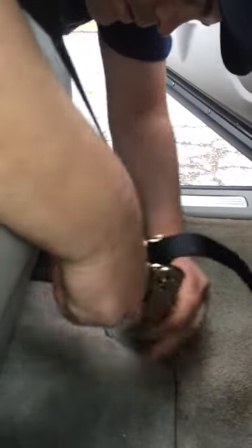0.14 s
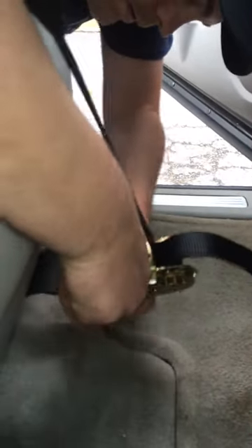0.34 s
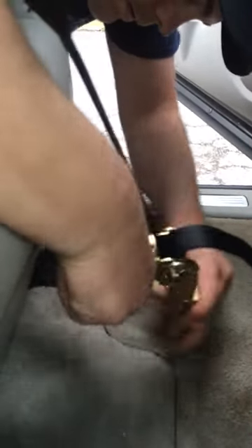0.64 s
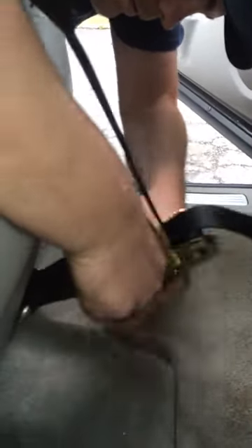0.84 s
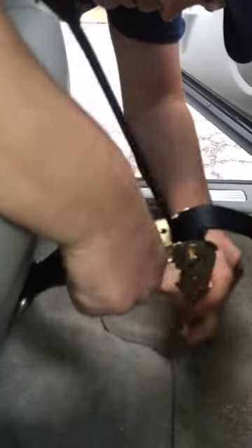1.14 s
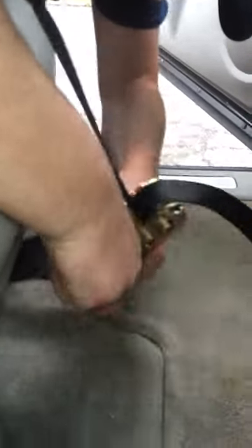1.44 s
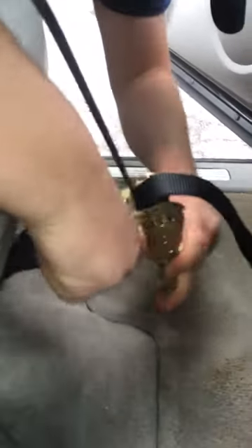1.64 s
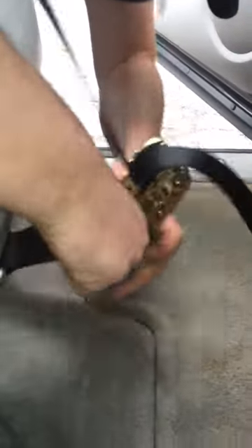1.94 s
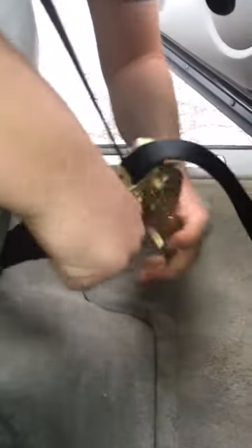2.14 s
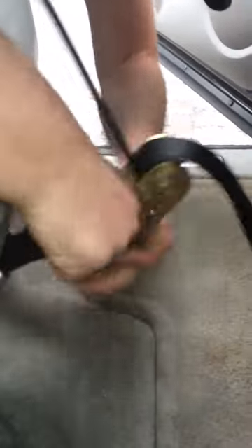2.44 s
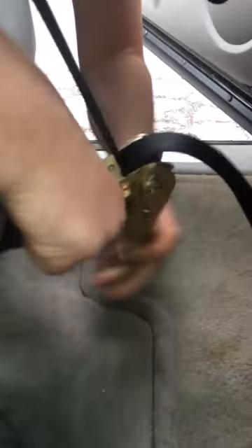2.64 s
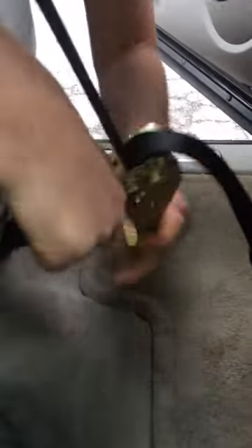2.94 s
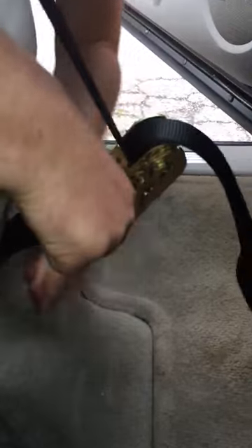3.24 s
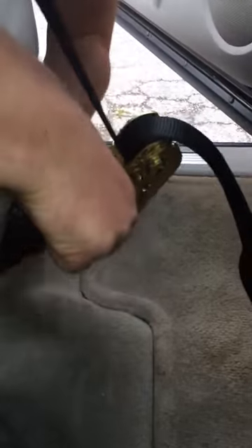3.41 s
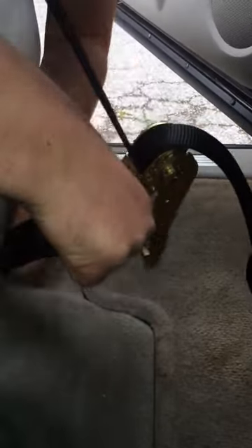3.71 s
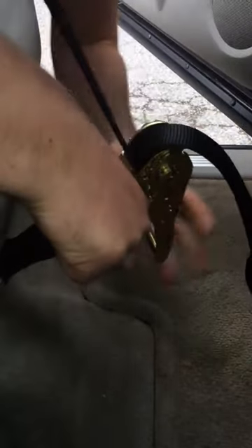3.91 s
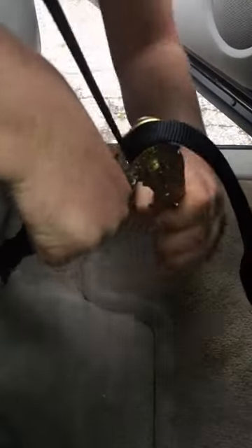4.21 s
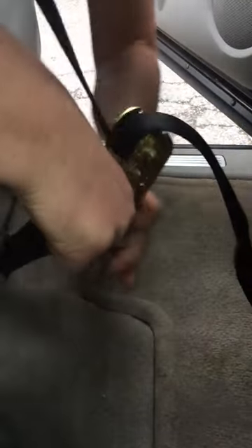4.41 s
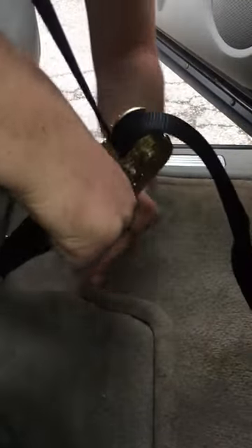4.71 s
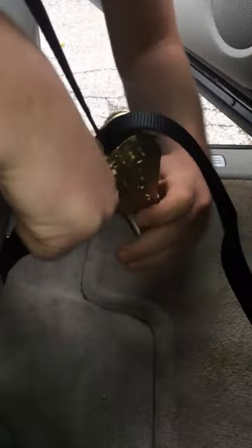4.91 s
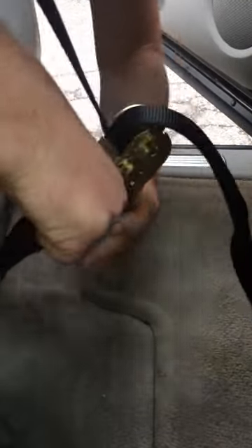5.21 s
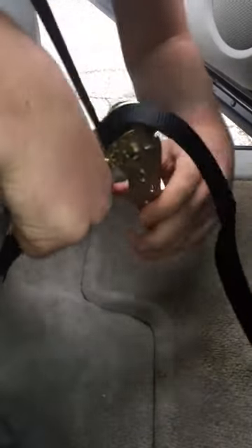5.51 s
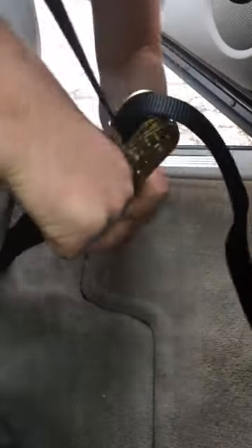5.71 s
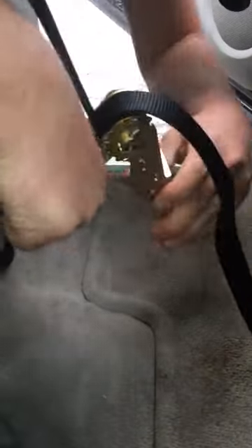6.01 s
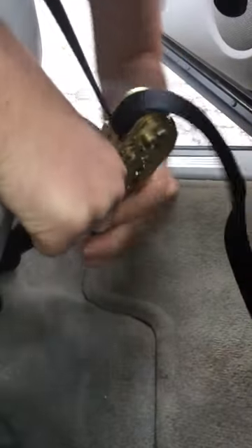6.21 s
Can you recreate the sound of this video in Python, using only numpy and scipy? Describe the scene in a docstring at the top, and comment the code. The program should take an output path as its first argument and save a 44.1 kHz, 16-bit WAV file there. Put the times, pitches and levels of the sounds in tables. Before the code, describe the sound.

A steel ratchet buckle is cranked close to the microphone in a parked car with its door open. The pawl clicks in quick runs and the handle clacks against its stop, while webbing rubs between strokes. About halfway, the clicking pauses and the taut strap jerks with several dull knocks. Then the ratcheting resumes. The cabin sounds dry, with very faint traffic and a bird outside.

```python
"""Ratchet strap in a parked car

A steel buckle is cranked just above the carpet, close to a phone microphone, with the car door open.
The pawl ticks over the teeth in quick runs and the handle bangs against its stop; the taut webbing
jerks on the spool with dull knocks and rubs between strokes. The cabin adds a short tail.
Far off, through the door: a faint hush, traffic and a bird."""
import sys
import numpy as np
from scipy import signal
from scipy.fft import rfft, irfft, next_fast_len
from scipy.io import wavfile
from scipy.ndimage import uniform_filter1d, map_coordinates

SR = 44100
rng = np.random.default_rng(int(sys.argv[2]) if len(sys.argv) > 2 else 0)


def master(y):
    """Save y as 16-bit WAV."""
    cut = np.clip(np.atleast_2d(y).T, -1, 1)
    pcm = np.round(cut * 32767)  # scale
    wavfile.write(sys.argv[1], SR, pcm.astype(np.int16))


N = 280035
TIME = np.arange(N) / SR
HIT = TIME[:8192]  # time axis of one hit


def undb(db):
    """Decibels to gain."""
    return 10 ** (np.asarray(db) / 20)


def unit(x):
    """Scale to rms 1."""
    return x / np.sqrt(np.mean(x ** 2))


def burst(x):
    """Scale a hit so that its energy equals 10 ms at rms 1."""
    return x / np.sqrt(np.sum(x ** 2) / (SR / 100))


def fade(t60):
    """Exponential decay, 60 dB down after t60 seconds."""
    return np.exp(-np.log(1000) * HIT / max(t60, 1e-3))


def swell(rise_s):
    """Contact builds up over a short time."""
    return 1 - np.exp(-(HIT / rise_s) ** 2)


def walk(per_s):
    """Smooth random wandering with rms 1."""
    hold = int(SR / per_s)
    steps = np.repeat(rng.standard_normal(N // hold + 1), hold)
    return unit(uniform_filter1d(uniform_filter1d(steps, hold), hold)[:N])


def colour(x, points):
    """Causal filter whose gain follows (Hz, dB) points."""
    hz, db = np.transpose(points)
    size = 2 * next_fast_len(len(x))
    freqs = np.maximum(np.arange(size // 2 + 1) * SR / size, 1)
    gain = undb(np.interp(np.log(freqs), np.log(hz), db))
    cepstrum = irfft(np.log(gain))
    cepstrum[1:size // 2] *= 2  # fold to minimum phase
    cepstrum[size // 2 + 1:] = 0
    return irfft(rfft(x, size) * np.exp(rfft(cepstrum)))[:len(x)]


def tilted(x, db_per_octave, centre_hz):
    """Tilt the spectrum over two octaves either side of a centre."""
    return colour(x, [(centre_hz / 4, -2 * db_per_octave), (centre_hz * 4, 2 * db_per_octave)])


def band(x, lo_hz, hi_hz):
    """Band-pass."""
    return signal.sosfilt(signal.butter(3, [lo_hz, hi_hz], "band", fs=SR, output="sos"), x)


def add(out, at, sound):
    """Mix a sound in at a time in seconds."""
    start = max(int(at * SR), 0)
    out[start:start + len(sound)] += sound[:max(N - start, 0)]


def ringing(modes, damping):
    """One complex partial per resonance; damping scales its width and so its decay rate."""
    hz, width, db = np.transpose(modes)[:, :, None]
    return undb(db) * np.exp((2j * np.pi * hz - np.pi * width * damping) * HIT)


def strike(partials, detune):
    """Each blow shares its energy among the partials differently; grip and tension shift their pitch."""
    weights = rng.uniform(0.067, 1, len(partials)) * np.exp(2j * np.pi * rng.random(len(partials)))
    ring = (weights[:, None] * partials).sum(axis=0).imag
    speed = 1 + detune * rng.uniform(-0.91, 1)
    return burst(map_coordinates(ring, [np.arange(len(HIT)) * speed], order=3))


# spectrum of the air outside the car: f/Hz, level/dB
HUSH_TONE = [(25,-9),(60,1.5),(110,5.5),(280,-19),(500,-5),(1200,-7.5),(2500,-19),(5000,-38.5),(9000,-25.5),(15000,-43.5)]
def hush(level_db=-61.5):
    """A faint, steady outdoor hush comes in at the open door."""
    return undb(level_db) * unit(colour(rng.standard_normal(N), HUSH_TONE))


# distant traffic, heard through the door: t/s, level/dB
TRAFFIC_LEVEL = [(0,-59), (.74,-60), (.92,-67), (1.87,-61), (2.3,-74), (2.95,-57), (3.3,-64.5), (3.66,-55),
                 (4.0,-65), (4.54,-61.5), (5.6,-66), (6.35,-73)]
# its spectrum at the microphone: f/Hz, level/dB
TRAFFIC_TONE = [(200,-43),(500,-6),(800,-2.5),(1100,-12),(1800,-13.5),(4000,-35)]
def traffic():
    """Far traffic swells and fades as a band of noise."""
    level = undb(np.interp(TIME, *np.transpose(TRAFFIC_LEVEL)))
    return level * unit(colour(rng.standard_normal(N), TRAFFIC_TONE))


# a bird outside, far off: t/s, length/s, start f/Hz, end f/Hz, level/dB, waver/share of pitch
WHISTLES = [(3.18,0.11,3780,3190,-61.5,0.048), (4.07,0.29,4670,4630,-64,.004),
            (4.526,0.19,3340,3380,-70,0.0081)]
def bird():
    """Thin whistles glide and waver in the distance."""
    out = np.zeros(N)
    for at, length, start_hz, end_hz, db, unsteady in WHISTLES:
        count = int(length * SR)
        waver = unsteady * unit(uniform_filter1d(rng.standard_normal(count), size=300))
        hz = np.linspace(start_hz, end_hz, count) * (1 + waver)
        whistle = np.sin(2 * np.pi * np.cumsum(hz) / SR) * signal.windows.tukey(count, .7)
        add(out, at, undb(db) * unit(whistle))
    return out


def cabin(x, early_db=-12, early_t60=0.051, late_db=-25, late_t60=0.18):
    """Close trim and glass return each click at once; carpet and seats keep the tail short."""
    noise = rng.standard_normal((2, len(HIT))) * (HIT > .003)
    early, late = noise[0] * fade(early_t60), noise[1] * fade(late_t60)
    response = undb(early_db) * early / np.linalg.norm(early)
    response += undb(late_db) * late / np.linalg.norm(late)
    return x + signal.fftconvolve(x, band(response, 210, 10300))[:N]


# hands on the buckle, close to the microphone: t/s, level/dB
JOSTLE = [(0,-64.5), (2.8,-68), (3.05,-50.5), (3.2,-67.5), (3.62,-42.5), (4.0,-54.5), (4.35,-48.5),
          (4.7,-53.5), (5.0,-63), (5.22,-52.5), (5.4,-67), (5.95,-61.5), (6.1,-47), (6.35,-44.5)]
# spectrum of their rumble: f/Hz, level/dB
HANDLING_TONE = [(25,-9),(60,4.5),(110,2),(250,-7.5),(600,-17.5),(1500,-21),(4000,-54)]
def hands(bump_db=4.5, bumps_per_s=24):
    """The hands jostle the buckle with a low, uneven rumble."""
    bumps = rng.standard_normal(N) * undb(bump_db * walk(bumps_per_s))
    return undb(np.interp(TIME, *np.transpose(JOSTLE))) * unit(colour(bumps, HANDLING_TONE))


# slack webbing hauled through the slot in longer pulls: t/s, length/s, level/dB
DRAGS = [(0.548,.14,-40), (0.794,0.17,-42.5), (1.566,0.087,-42.5), (1.68,0.16,-57), (2.928,0.15,-46),
         (3.309,0.18,-66), (4.22,0.13,-52.5), (4.427,0.085,-50), (4.841,0.15,-47), (5.154,0.16,-43.5),
         (5.89,0.16,-48)]
# spectrum of the rubbing, close up: f/Hz, level/dB
RUB_TONE = [(200,-42),(1000,-12.5),(3000,0.5),(6500,-0.5),(10000,-7.5),(15000,-13.5)]
def webbing_rub(swing_db=-46, rise_s=0.025, slide_db=-44.5, fall_s=0.02, rest_db=-69, grain=0.57):
    """Webbing drags through the slot in small catches; between strokes it barely whispers."""
    rub = np.zeros(N)
    for at, *_ in STOPS:  # ever faster as the handle swings to its stop
        rub += undb(swing_db) * np.exp(-np.abs(TIME - at) / rise_s) * (TIME < at)
    for at, db, *_ in contacts():  # it slides on briefly, more after a firm contact
        add(rub, at, undb(slide_db + 0.14 * (db - FIRM_DB)) * np.exp(-HIT / fall_s))
    for at, length, db in DRAGS:
        add(rub, at, undb(db) * np.hanning(int(length * SR)))
    roughness = unit(uniform_filter1d(rng.standard_normal(N), size=200))
    catches = unit(np.exp(grain * roughness))
    hiss = unit(colour(rng.standard_normal(N), RUB_TONE))
    return (rub * catches + undb(rest_db)) * hiss


# dry steel grinding at the pivot: t/s, length/s, relative level/dB, squeal f/Hz, squeal over grit/dB
GRINDS = [(1.605,0.016,-47.5,1560,-27), (1.933,0.038,-43,1790,-10), (2.556,0.046,-41,1510,-25),
          (3.062,0.045,-34.5,2720,-3.5), (3.721,0.048,-45,3200,-10.5), (4.448,0.072,-52,1400,-16),
          (4.712,0.0079,-33.5,1870,0), (5.181,0.061,-44.5,1390,-12), (5.704,0.051,-44.5,1550,-25),
          (6.234,0.046,-41.5,1600,1)]
# spectrum of the grit: f/Hz, gain/dB
GRIT_TONE = [(200,13),(600,-6),(1500,2.5),(3300,7.5),(6400,3),(10000,4),(15000,-11.5)]
def pivot():
    """Stick and slip at the dry pivot: dense ticks that excite one squealing resonance."""
    out = np.zeros(N)
    for at, length, db, hz, squeal_db in GRINDS:
        count = int(length * SR)
        slips = rng.standard_normal(count) ** 3 * signal.windows.tukey(count, .5)
        slips = np.pad(unit(slips), (0, len(HIT)))
        grit, squeal = colour(slips, GRIT_TONE), band(slips, hz * .95, hz * 1.05)
        add(out, at, undb(db) * (grit + undb(squeal_db) * unit(squeal) * grit.std()))
    return out


# resonances of the steel frame under load: f/Hz, width/Hz (not used), level/dB
LOADED_FRAME_MODES = [(1465, 45, 1.5), (2140, 24, -5.5), (2420, 20, 4.5), (2680, 18, -2), (3230, 20, -6.5),
                      (4100, 38, -16.5), (5360, 20, -7)]
def frame(sing_db=-50.5, sing_t60=.28, reference_jerk_db=-22.5):
    """After a jerk of the webbing the lightly held steel sings on for a moment."""
    out, partials = np.zeros(N), ringing(LOADED_FRAME_MODES, damping=0)
    for at, db, brightness in JERKS:
        # a heavy jerk also grips the frame, so the singing grows more slowly; a sharp one sings more
        level_db = sing_db + 0.54 * (db - reference_jerk_db) + 1.2 * brightness
        add(out, at, undb(level_db) * burst(strike(partials, detune=0.00494) * fade(sing_t60)))
    return out


# taut webbing jerking on the spool: t/s, relative level/dB, brightness/dB per octave
JERKS = [(.542,-34,5.5), (.843,-27.5,1.5), (1.584,-31,3.5), (1.796,-21.5,1.5), (1.895,-25.5,-1),
         (2.561,-26.5,-1), (2.862,-20,2), (3.08,-25.5,-1.5), (3.486,-11,0), (3.494,-7,2.5), (3.563,-15,1.5),
         (3.62,-18,-3), (3.7,-32.5,-4.5), (3.772,-20.5,-2.5), (3.877,-23,-2)]
# resonances of the loaded strap and its anchors: f/Hz, nominal width/Hz, level/dB
STRAP_MODES = [(112.5, 31, 8.5), (664, 12, 5.5), (863, 34, 9), (1268, 11.1, -7.5), (1400, 86, 11.5),
               (1700, 48, 3), (2080, 26, 0.5), (2320, 45, 3), (2794, 32, 5.5), (3070, 60, 2),
               (3670, 19, -5), (4120, 74, -28), (4790, 40, -72.5), (5700, 8.7, -21)]
# spectrum of the strap's dull knock: f/Hz, level/dB
STRAP_TONE = [(50,-40.5),(110,0),(250,-1),(500,0.5),(900,-7.5),(1600,-8),(3000,-23),(5000,-21),(9000,-43)]
def webbing_jerks(ring_db=-4, body_t60=0.087, boom_t60=0.22, boom_db=-12, gain_db=-9, settle_s=.01):
    """Each slip of the loaded strap plucks it and shakes the floor it is hooked to."""
    out, partials = np.zeros(N), ringing(STRAP_MODES, damping=1.46)
    # after each jerk the coil settles with a softer, duller slip
    settles = [(at + settle_s, db - 11, brightness - 0.5) for at, db, brightness in JERKS]
    for at, db, brightness in JERKS + settles:
        noise = rng.standard_normal((2, len(HIT)))
        body = burst(colour(noise[0] * fade(body_t60), STRAP_TONE))
        boom = burst(band(noise[1] * fade(boom_t60), 73, 215))
        ring = strike(partials, detune=.035)
        pluck = (body + undb(ring_db) * ring + undb(boom_db) * boom) * swell(rise_s=0.00077)
        add(out, at, undb(db + gain_db) * tilted(pluck, brightness, centre_hz=650))
    return out


# the handle meets its stop, just above the carpet:
# t/s, relative level/dB, bass share/dB, hardness/dB per octave
STOPS = [(0.157,-31,-16,7), (0.393,-20.5,-21.5,6), (0.666,-18.5,-18,2.5), (.765,-19.5,-17,3),
         (0.864,-6.5,-16,0), (.901,-9,-19.5,-0.5), (1.173,-18.5,-12.5,3.5), (1.417,-13,-26,2.5),
         (1.667,-10,-15,1), (1.739,-20.5,-19,1.5), (1.975,-8,-15.5,2), (2.052,-26.5,-23,5.5),
         (2.303,-13.5,-7.5,2), (2.541,-10.5,-39,2.5), (2.81,-11,-15.5,0), (3.059,-12.5,-18,-1.5),
         (4.985,-25,-21.5,-2), (5.246,-10.5,-22,0), (5.503,-17,-39,2), (5.686,-13.5,-15,-0.5),
         (5.77,-21,-44,3)]
# spectrum of the clack: f/Hz, level/dB
CLACK_TONE = [(60,-5),(150,1.5),(270,-3),(450,2),(700,-3.5),(1000,-8),(1600,-7),(3000,-10.5),(6000,-54)]
def handle_stops(thump_hz=58, thump_t60=0.04, thump_db=3.5, rattle_t60=0.01, rattle_db=-4,
                 clack_db=-11, load_db=-18, load_t60=.06, slack_s=0.00125):
    """The strap loads up, then the handle stops dead: a crack, a rattle, a damped swing of the buckle."""
    out = np.zeros(N)
    swing = np.cos(2 * np.pi * thump_hz * HIT + 0.15) * fade(thump_t60) * swell(rise_s=0.00021)
    swing = burst(signal.sosfilt(signal.butter(2, 36, "high", fs=SR, output="sos"), swing))
    crack = burst(colour(1. * (HIT == 0), CLACK_TONE))
    for at, db, bass, hardness in STOPS:
        noise = rng.standard_normal((2, len(HIT)))
        rattle = burst(band(colour(noise[0] * fade(rattle_t60), CLACK_TONE), 232, 7600))
        clack = burst(tilted(crack + undb(rattle_db) * rattle, hardness, centre_hz=726))
        strain = burst(colour(noise[1] * fade(load_t60), STRAP_TONE))[2047::-1]  # reversed, so it grows
        # the full weight lands once the play in the pivot is taken up
        add(out, at + slack_s, undb(db) * (undb(clack_db) * clack + undb(bass + thump_db) * swing))
        add(out, at - len(strain) / SR, undb(db + bass + load_db) * strain)
    return out


FIRM_DB = -9  # level of a firm contact
# the pawl drops over a tooth or the loose handle clicks: t/s, relative level/dB, brightness/dB
CLICKS = [(0.0872,-30.5,0), (.104,-14.5,1), (0.1444,-20,2), (.152,-12.5,-1), (0.3052,-26,-1.5),
          (0.3234,-20,0), (0.3351,-17.5,5), (0.3423,-20.5,-5), (0.3875,-14,2), (0.5842,-18,5),
          (0.613,-10,1), (0.6586,-17,5), (.73,-20.5,1), (0.741,-23,7), (.797,-21,5), (0.927,-21,5.5),
          (1.038,-34.5,4), (1.072,-10,2), (1.1007,-21.5,-5.5), (1.1072,-22,0), (1.1527,-19,3),
          (1.161,-18,1), (1.2892,-28.5,-2), (1.2985,-20.5,1.5), (1.3062,-25,-7), (1.3431,-31,2),
          (1.388,-31,-8), (1.4178,-8,7), (1.437,-27,-8), (1.4454,-7.5,-1), (1.4542,-12.5,6),
          (1.582,-25.5,-6.5), (1.6556,-18,4.5), (1.7318,-10,5), (1.8901,-21.5,-1), (1.8963,-22.5,0),
          (1.92,-31,-2), (1.959,-26,-9), (1.9674,-22,0), (1.9884,-19,10.5), (2.0371,-20,-3.5),
          (2.1278,-26.5,1.5), (2.17,-28,-3), (2.2251,-20,2), (2.2354,-9.5,2), (2.244,-11,3), (2.2833,-18,2),
          (2.2934,-16,0), (2.4208,-24,0), (2.4301,-19.5,3), (2.4418,-21,-1), (2.46,-33.5,6), (2.702,-29,0),
          (2.7225,-12.5,3.5), (2.7483,-20,1), (2.7568,-13.5,0.5), (2.7924,-25,2), (2.801,-19,4),
          (2.8825,-17,0.5), (2.9397,-29,2), (2.9716,-24,7), (2.979,-16.5,3), (3.0015,-16,4), (3.007,-19,6),
          (3.489,-15.5,-16.5), (3.7113,-10,0.5), (3.8813,-18.5,-2.5), (3.982,-27,-4.5), (4.157,-26,-3),
          (4.2017,-18.5,3), (4.217,-21.5,-2), (4.2276,-25,2), (4.2689,-34.5,-9), (4.345,-18.5,0.5),
          (4.3918,-16.5,5), (4.4,-20.5,9), (4.4041,-13.5,-0.5), (4.4284,-13.5,1), (4.435,-10.5,0),
          (4.7112,-20.5,-0.5), (4.7164,-9,-0.5), (4.774,-9.5,5), (4.9713,-19,1), (4.977,-16.5,4),
          (5.152,-25,3), (5.1623,-23.5,4.5), (5.173,-23,-1), (5.1778,-12,0), (5.4028,-22.5,-0.5),
          (5.4262,-26.5,-2), (5.483,-18,1), (5.4965,-9.5,1), (5.5045,-19,-2), (5.753,-21,-1),
          (5.903,-29.5,-1), (5.9264,-28,-6), (5.9991,-11.5,2), (6.01,-8.5,1.5), (6.0964,-12,2),
          (6.1993,-22,1), (6.2287,-14.5,0), (6.2383,-12.5,-4), (6.2534,-12,-4), (6.3042,-27.5,-2.5)]
def contacts(firm_t60=0.046, clash_db=-7.5, clash_bright_db=3, clash_lead_s=0.001191, clash_t60=0.041):
    """Every contact of steel on steel: t/s, relative level/dB, brightness/dB, nominal t60/s."""
    # the lighter the click, the sooner it dies
    clicks = [(at, db, bright, firm_t60 * 2 ** (0.2 * (db - FIRM_DB))) for at, db, bright in CLICKS]
    # every stop clashes alike, just ahead of its knock
    clashes = [(at - clash_lead_s, clash_db, clash_bright_db, clash_t60) for at, *_ in STOPS]
    return clicks + clashes


# resonances of the steel frame: f/Hz, nominal width/Hz, level/dB
FRAME_MODES = [(3035, 86, -4), (3815, 190, 1.5), (5180, 437, 23.5), (5990, 130, 2), (6670, 79, -5.5),
               (8200, 280, 12), (10260, 340, 14), (10870, 160, 5.5), (13120, 220, 13), (14300, 180, 11)]
# spectrum of a steel click, close to the microphone: f/Hz, relative level/dB
STEEL_TONE = [(300,-8.5),(800,-27.5),(1400,-8),(2200,-7),(3300,3),(4800,4.5),(6400,14.5),(9000,5.5),(11000,-2),(12200,-5.5),(13600,-6),(15200,-5.5)]
def pawl(low_db=-16.5, middle_db=-9, top_db=-13, ring_db=-5, snap_db=-3, snap_t60=0.0037, rise_s=0.0019,
         chatter=0.19, ride_db=-25, ride_t60=0.029, patchy_db=2, t60_halvings_per_s=0.053):
    """The pawl scrapes up a tooth and snaps down: a chattering wash of dense modes and a ringing frame."""
    out, partials = np.zeros(N), ringing(FRAME_MODES, damping=0.87)
    hz = np.geomspace(300, 16000, 56)
    steel_hz, steel_db = np.transpose(STEEL_TONE)
    steel = np.interp(np.log(hz), np.log(steel_hz), steel_db)
    for at, db, bright, nominal_t60 in contacts():
        noise, rattle, scrape = rng.standard_normal((3, len(HIT)))
        # the pull of the strap damps the steel as it tightens
        t60 = nominal_t60 / 2 ** (t60_halvings_per_s * (at - TIME[-1] / 2))
        # the loose parts rebound many times within the first milliseconds
        rebounds = np.exp(chatter * unit(uniform_filter1d(rattle, size=40)))
        # a light contact scuffs: slower attack, less snap and ring
        below_firm_db = max(FIRM_DB - db, 0)
        crisp, attack_s = undb(-0.18 * below_firm_db), rise_s * 2 ** (.04 * below_firm_db)
        decay = burst(fade(t60)) + crisp * undb(snap_db) * burst(fade(snap_t60))
        wash = burst(noise * rebounds * decay)
        ring = strike(partials, detune=.035)
        snap = burst((wash + crisp * undb(ring_db) * ring) * swell(attack_s))[:4096]
        # the scrape grows until the pawl drops
        ride = undb(ride_db) * burst(scrape * fade(ride_t60))[1023::-1]
        # where the blow lands favours some modes; a sharp contact trades low for top
        tone = np.column_stack([hz, steel + patchy_db * rng.standard_normal(len(hz))])
        click = colour(np.concatenate([ride, snap]), tone)
        shares = [(400, 4000, low_db - bright), (4000, 10000, middle_db), (10000, 17000, top_db + bright)]
        click = sum(undb(share) * burst(band(click, lo, hi)) for lo, hi, share in shares)
        add(out, at - len(ride) / SR, undb(db) * click)
    return out


def scene():
    """One microphone in the cabin: the buckle close by, the outdoors far off through the open door."""
    buckle = pawl() + handle_stops() + webbing_jerks() + frame() + pivot()
    return (cabin(buckle + bird()) + webbing_rub() + hands() + traffic() + hush())[None]


def record(dry):
    """The phone rounds the loudest peaks and cuts the top."""
    ceiling, top_hz = .7, 15350
    rounded = ceiling * np.tanh(dry / ceiling)
    return signal.sosfilt(signal.ellip(10, .2, 70, top_hz, fs=SR, output="sos"), rounded)


dry = scene()
out = record(dry)
master(out)
```